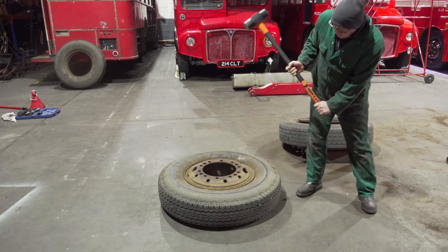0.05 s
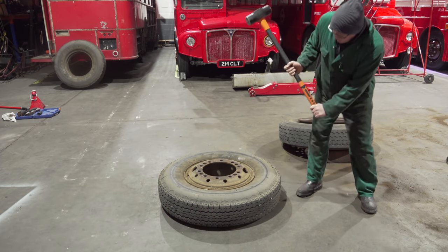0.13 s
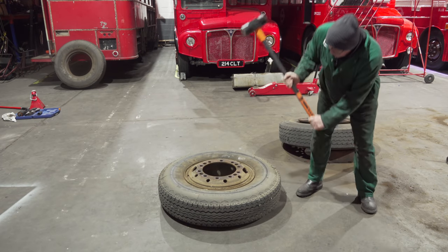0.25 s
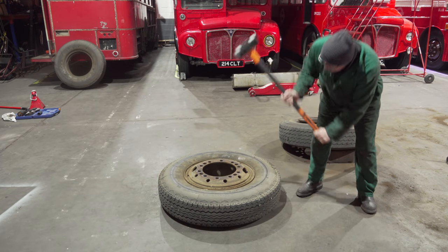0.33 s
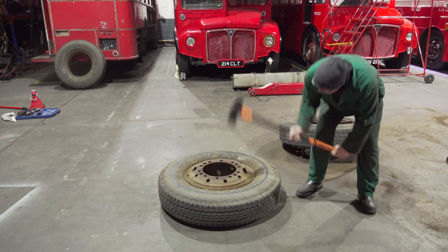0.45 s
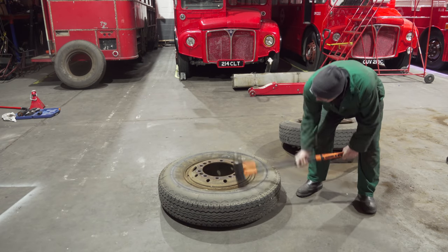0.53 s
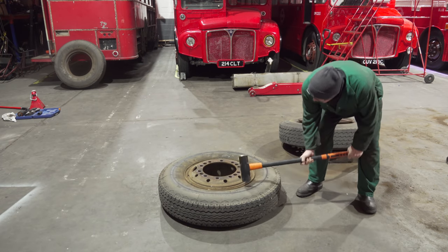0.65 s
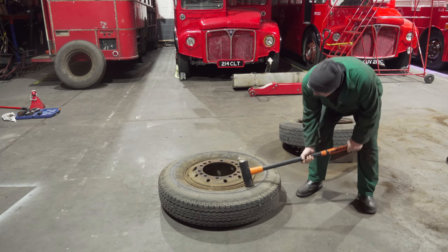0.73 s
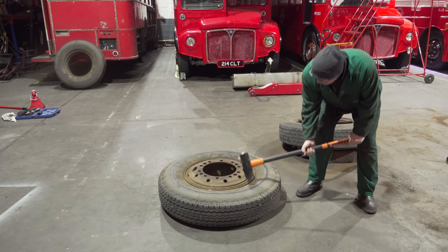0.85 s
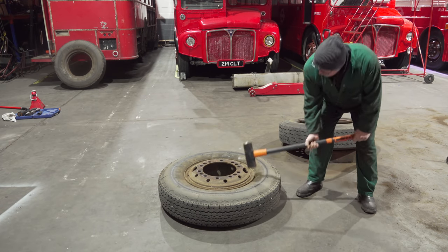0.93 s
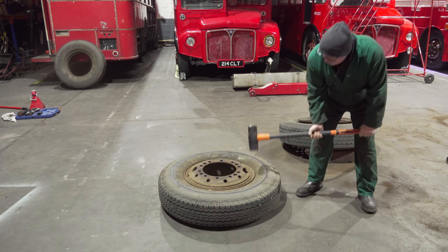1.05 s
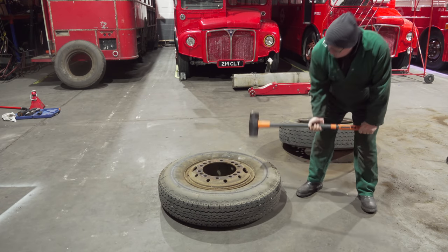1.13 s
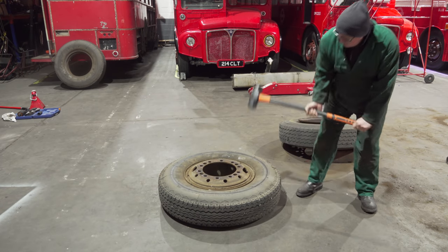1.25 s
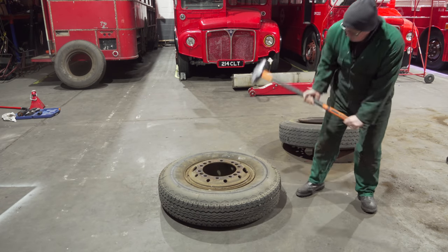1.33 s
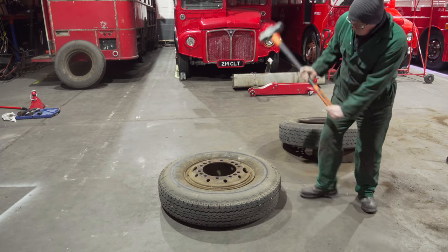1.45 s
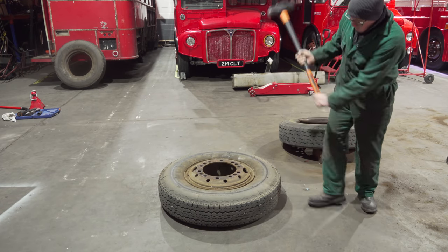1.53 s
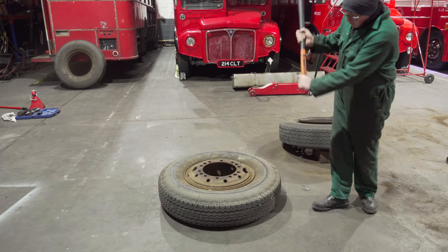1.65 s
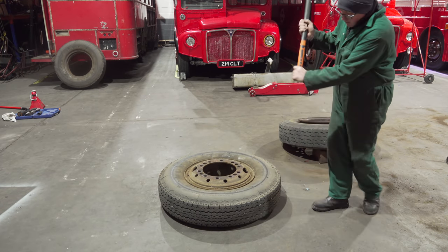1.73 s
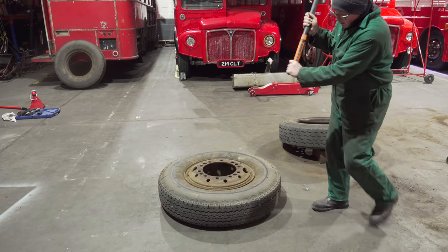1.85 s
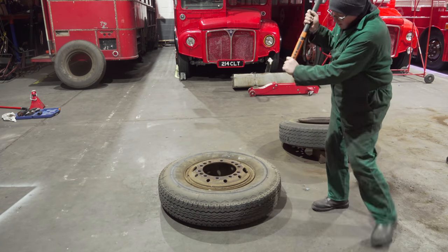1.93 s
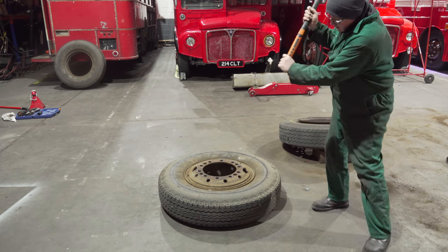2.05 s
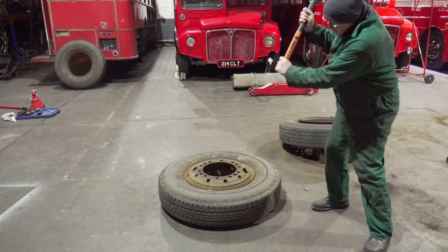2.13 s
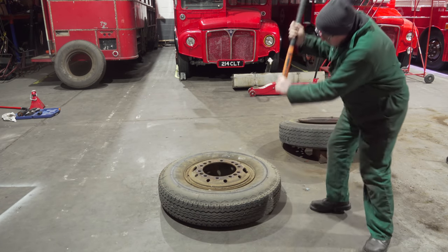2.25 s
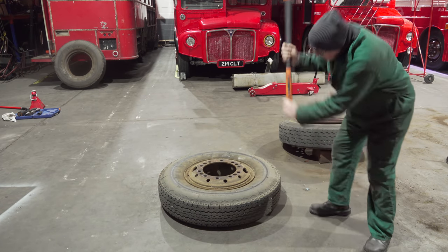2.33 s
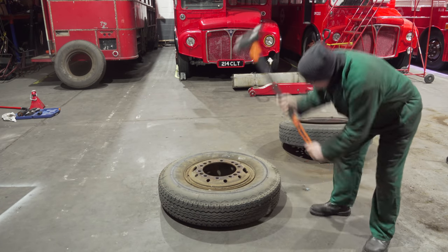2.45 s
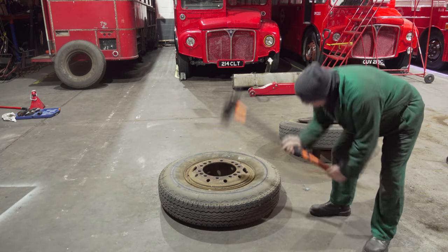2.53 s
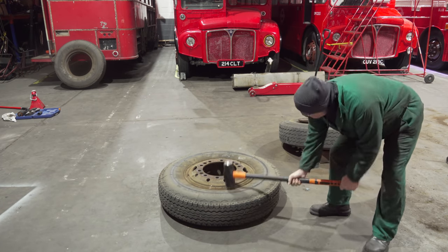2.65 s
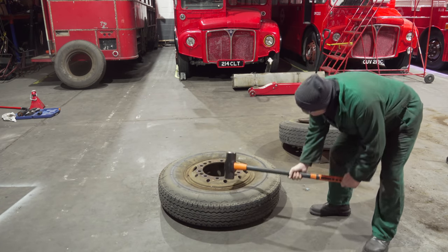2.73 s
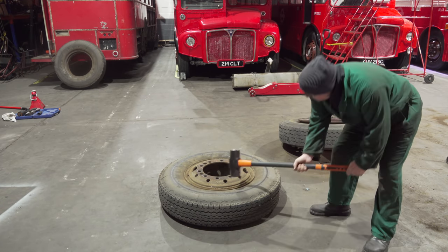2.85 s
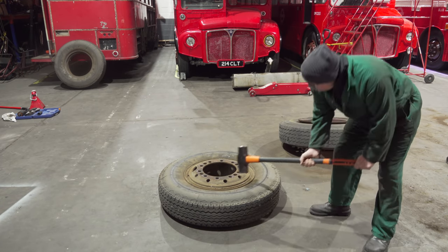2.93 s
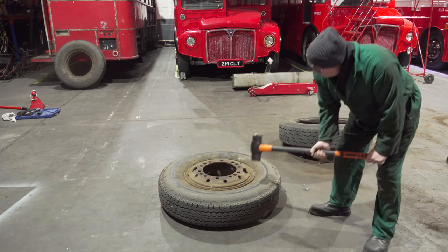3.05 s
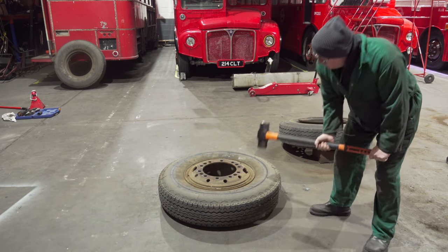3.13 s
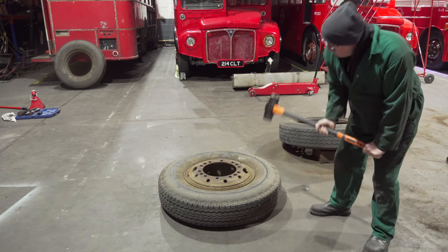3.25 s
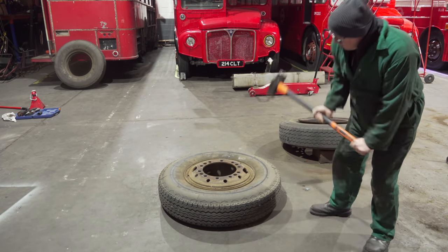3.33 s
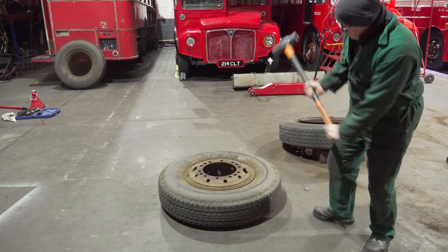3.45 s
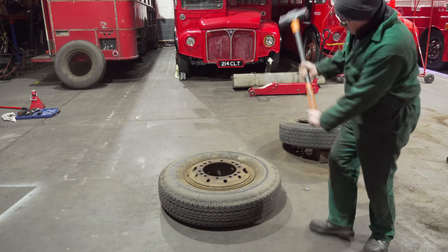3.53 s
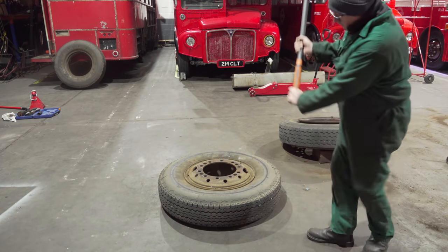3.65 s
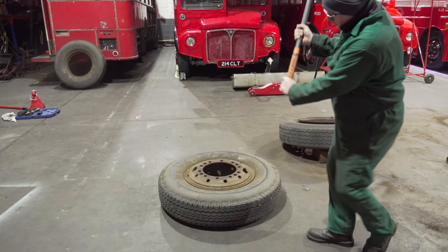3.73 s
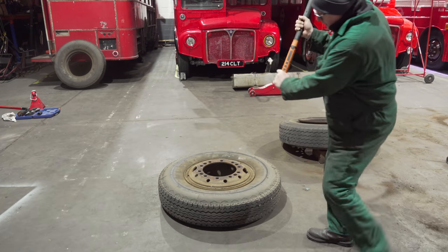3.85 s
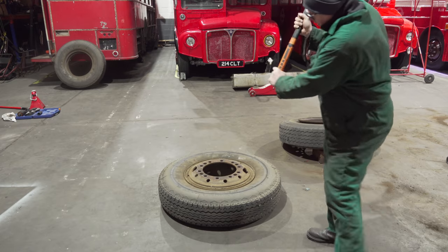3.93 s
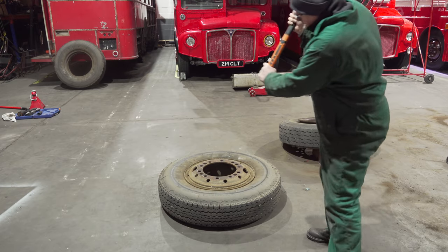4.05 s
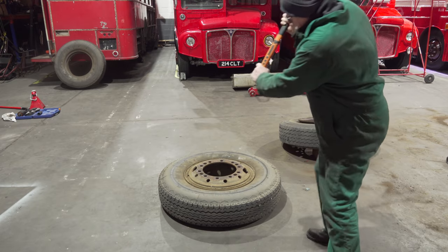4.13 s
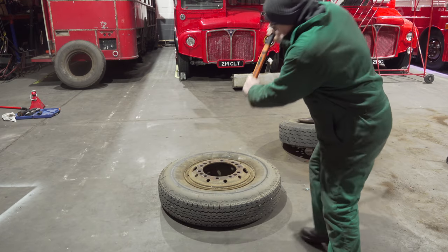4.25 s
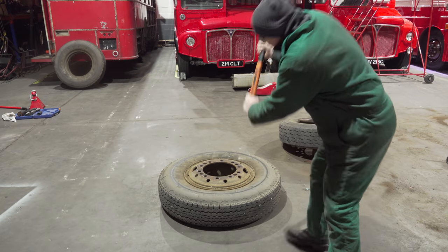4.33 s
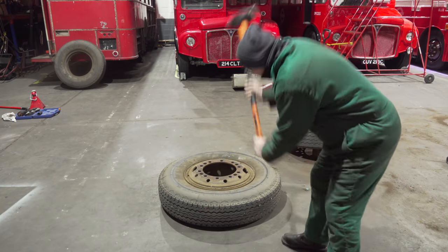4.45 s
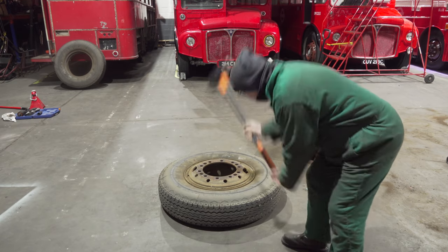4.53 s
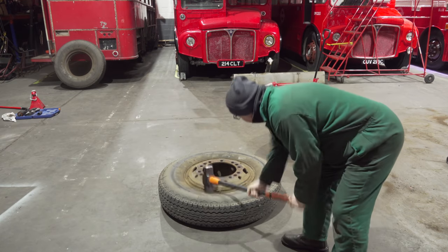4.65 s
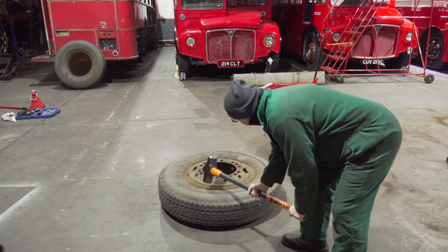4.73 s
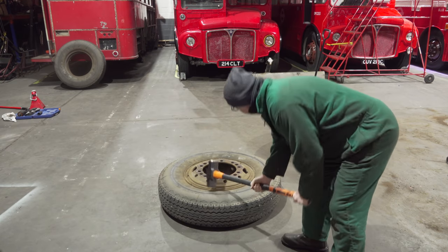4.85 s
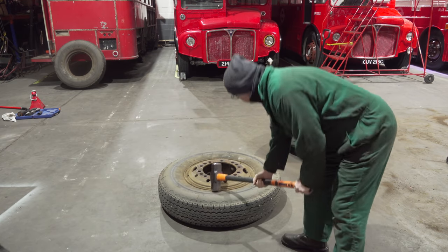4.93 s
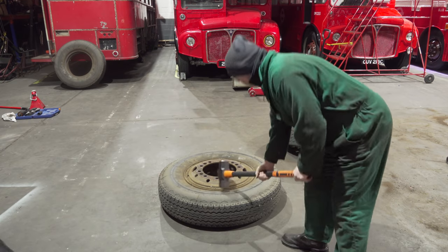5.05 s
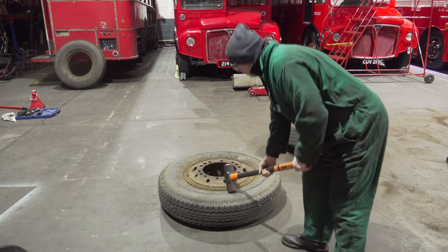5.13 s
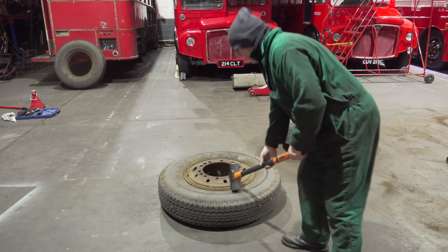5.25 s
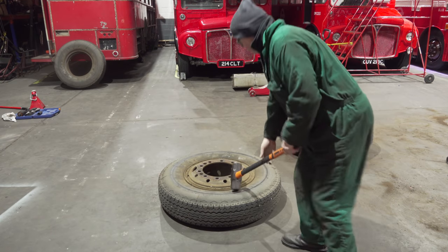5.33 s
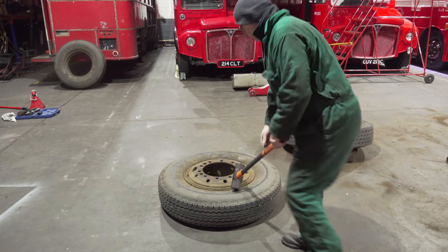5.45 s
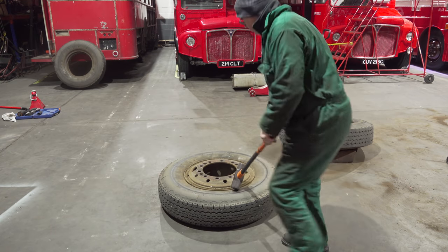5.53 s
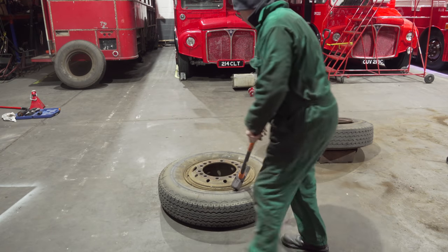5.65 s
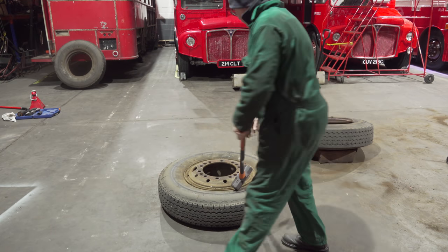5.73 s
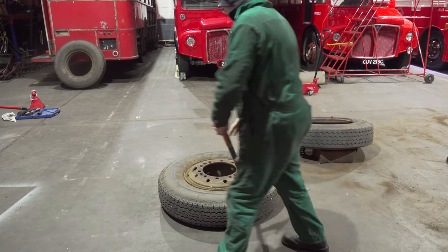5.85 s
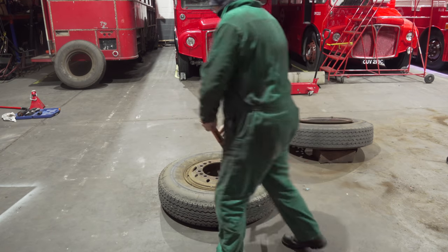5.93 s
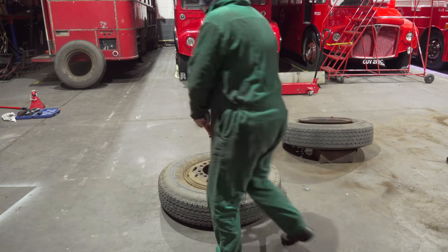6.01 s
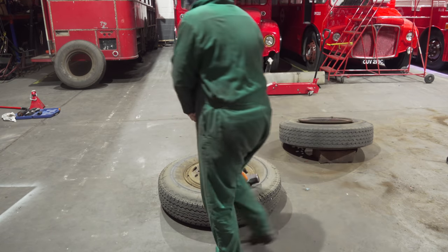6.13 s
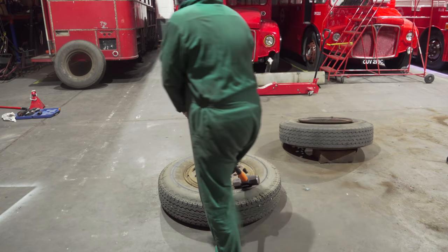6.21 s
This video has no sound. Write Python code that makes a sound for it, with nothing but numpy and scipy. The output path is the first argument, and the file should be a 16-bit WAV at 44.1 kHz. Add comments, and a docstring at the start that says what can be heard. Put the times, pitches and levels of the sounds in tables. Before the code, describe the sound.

Quiet hall air and a hand sliding on a shaft, then a violent thud and steel clatter as a sledgehammer hits a tyred wheel. The tyre chokes the ring, but the big garage answers with over a second of echo. Two more blows follow at roughly two-second intervals, each preceded by small handling sounds and a planted, gritty boot. A soft, dull knock ends it. Fairly close microphone, loud peaks briefly ducked.

```python
"""A worker in a big garage slides his hands on a sledgehammer shaft, then hits a lorry tyre and its steel wheel.
Three blows: pressure pulse (thud), decaying random clatter (crash) and damped sine modes (wheel ring).
A limiter ducks each blow, then lets the long banded-noise echo of the hall swell up.
Between blows, filtered slips and knocks make sliding palms, grips, swishing overalls and boots on concrete.
At the end the head is set down: a soft knock, a tyre boom and a faint, dull wheel ring, over steady hall air."""
import sys
import numpy as np
from scipy import signal
from scipy.fft import rfft, irfft, next_fast_len
from scipy.io import wavfile
from scipy.ndimage import uniform_filter1d

SR = 44100
rng = np.random.default_rng(int(sys.argv[2]) if len(sys.argv) > 2 else 0)


def unload_audio(sound):
    """Save the sound as a 16-bit wav file, at the path given as the first command line argument."""
    columns = np.transpose(np.atleast_2d(sound))
    # keep every value between -1 and 1, then stretch to whole-number steps
    steps = np.round(np.clip(columns, -1, 1) * 32767)
    wavfile.write(sys.argv[1], SR, steps.astype(np.int16))


N = 276938

# blows: (time [s], relative thud level [dB], relative crash level [dB], crash delay [s], crash t60 [s])
HAMMER_BLOWS = [(0.6018, -0.95, -0.4, 0.00027, 0.027), (2.6715, 0.5, 0, .0014, 0.028),
                (4.708, 0.5, 0, .0009, 0.027)]
# steel wheel modes, damped by the tyre; each blow lands on another spot:
# (frequency [Hz], t60 [s], relative level in blow 1 [dB], in blow 2 [dB], in blow 3 [dB])
WHEEL_MODES = [(131, 0.11, -25, -27.5, -28), (300, 0.055, -20, -16, -15), (436, 0.053, -33.5, -17.5, -26),
               (619, 0.092, -16.5, -17, -19), (756, 0.13, -21, -20.5, -20), (848.6, 0.058, -20, -13.5, -29),
               (1033, 0.13, -21, -20.5, -19.5), (1198, 0.054, -26.5, -29, -18.5),
               (1252, 0.096, -33, -27, -20.5), (1500, 0.28, -25, -25, -28.5), (1913, 0.25, -38, -31.5, -32),
               (2587, 0.058, -19.5, -25.5, -23.5), (2856, 0.11, -26, -21, -28.5),
               (3110, .07, -24, -29.5, -31.5), (3430, .08, -25.5, -25.5, -26), (3875, 0.11, -20, -18, -22),
               (4110, 0.085, -22, -25.5, -22.5), (4255, 0.06, -29, -26, -19.5),
               (4350, .06, -24, -23.5, -21), (4800, 0.055, -24.5, -20.5, -23.5),
               (4930, 0.041, -34, -29.5, -20.5), (6500, .025, -21, -15.5, -13),
               (7460, 0.042, -26.5, -30.5, -23.5)]
# boot planted just before the blow:
# (time [s], relative thump level [dB], thump top edge [Hz], relative slap level [dB], grit level [dB])
BOOT_STAMPS = [(2.553, -41, 1280, -53, -66), (4.624, -45, 403, -43.5, -46)]


def from_db(db):
    """Decibels to gain."""
    return 10 ** (np.asarray(db) / 20)


def rms_one(x):
    """Scale to rms 1."""
    return x / np.sqrt(np.mean(x ** 2) + 1e-20)


def seconds(length_s):
    """Time axis of a short sound."""
    return np.arange(int(length_s * SR)) / SR


def fade(t, t60_s):
    """Exponential decay, 60 dB in t60."""
    return np.exp(-np.log(1000) * t / t60_s)


def add(track, time_s, sound):
    """Mix a sound into the track."""
    at = int(np.clip(round(time_s * SR), 0, N - 1))
    track[at:at + len(sound)] += sound[:N - at]


def band(x, low_hz, high_hz, order=2):
    """Causal Butterworth band-pass."""
    return signal.sosfilt(signal.butter(order, [low_hz, high_hz], "band", fs=SR, output="sos"), x)


def within(x, low_hz, high_hz, order=3):
    """Keep one band, at the same energy."""
    kept = band(x, low_hz, high_hz, order=order)
    return kept * np.linalg.norm(x) / np.linalg.norm(kept)


def coloured(x, spectrum):
    """Causal (minimum-phase) filter with a given spectrum shape and unit energy."""
    size = 2 * next_fast_len(len(x))
    hz, db = np.transpose(spectrum)
    log_hz = np.log(np.fft.rfftfreq(size, 1 / SR) + 1)
    gain = from_db(np.interp(log_hz, np.log(hz), db))
    # fold the cepstrum onto positive time
    cepstrum = irfft(np.log(rms_one(gain)))
    cepstrum[1:size // 2] *= 2
    cepstrum[size // 2 + 1:] = 0
    response = np.exp(rfft(cepstrum))
    return irfft(rfft(x, size) * response)[:len(x)]


def burst(t, t60_s, all_round):
    """Unit-energy clatter; summed over all directions its ripples even out, so the hall gets one clean pulse."""
    if all_round:
        clatter = 1.0 * (t == 0)
    else:
        clatter = rng.choice([-1, 1], len(t)) * fade(t, t60_s)
    return clatter / np.linalg.norm(clatter)


def knock(t60_s, all_round):
    """Short dead contact: clatter starting at rms 1, or one pulse of the same energy for the hall."""
    t = seconds(.3)
    return burst(t, t60_s, all_round) * np.linalg.norm(fade(t, t60_s))


def slips(grain_db=6.5):
    """Rubbing: half a second of tiny slips of uneven size, rms 1."""
    count = len(seconds(.5))
    sizes = from_db(grain_db * rng.standard_normal(count))
    return rms_one(rng.standard_normal(count) * sizes)


def stroke(length_s):
    """Slips under one movement that speeds up and stops."""
    speed = np.abs(np.sin(np.pi * np.minimum(seconds(.5) / length_s, 1)))
    return slips() * np.sqrt(speed)


def still_air(level_db=-71.5):
    """Still air of the hall: steady coloured noise."""
    # (frequency [Hz], relative level [dB])
    air_spectrum = [(18, -45), (30, -10), (103, -10.5), (170, 3.5), (233, -4.5), (486, -3), (822, -1.5),
                    (1130, -5), (2480, -4.5), (4300, -7.5), (9970, -16.5), (14800, -15), (16000, -23)]
    return from_db(level_db) * rms_one(coloured(rng.standard_normal(N), air_spectrum))


def hands():
    """Palms rub along the shaft as the grip changes for the lift and for the swing."""
    # slides: (time [s], length [s], level [dB])
    slides = [(0.0, 0.03, -57), (0.018, .036, -49.5), (1.583, 0.071, -61), (1.963, 0.1, -69),
              (2.047, .038, -57.5), (2.348, .026, -63), (2.37, 0.052, -57.5), (3.595, .075, -56.5),
              (3.961, 0.053, -68.5), (4.007, 0.034, -62.5), (4.407, .04, -63)]
    # palm on the shaft: (frequency [Hz], relative level [dB])
    palm_spectrum = [(200, -22.5), (700, -10.5), (1500, -3.5), (2800, 1), (5500, -3), (8000, -7.5),
                     (12000, -16), (16000, -21.5)]
    out = np.zeros(N)
    for time_s, length_s, db in slides:
        add(out, time_s, from_db(db) * coloured(stroke(length_s), palm_spectrum))
    return out


def ticks(all_round, t60_s=.02):
    """Tiny hard contacts, an octave either side of their centre; the loudest is the head grazing the rim."""
    # (time [s], relative level [dB], centre [Hz])
    small_ticks = [(0.232, -51.5, 2800), (1.966, -55.5, 7000), (2.348, -55, 1500), (2.370, -51.5, 7500),
                   (4.407, -57.5, 1500), (4.682, -43, 6500), (4.7057, -29, 5600), (5.635, -61, 8000),
                   (5.674, -56, 8010)]
    out = np.zeros(N)
    for time_s, db, hz in small_ticks:
        add(out, time_s, from_db(db) * within(knock(t60_s, all_round), hz / 2, hz * 2))
    return out


def thuds(level_db=16.5):
    """The head lands and tyre and wheel disc give one pressure pulse."""
    # (frequency [Hz], relative level [dB])
    thud_spectrum = [(8, -26.5), (28, -13.5), (55, -11), (80, -11.5), (105, -3.5), (180, -2), (235, -5),
                     (380, -0.5), (560, -1), (990, -2), (1130, -9.5), (1500, -10.5), (2200, -22.5),
                     (16000, -62.5)]
    out = np.zeros(N)
    pulse = coloured(1.0 * (seconds(.3) == 0), thud_spectrum)
    for time_s, db, *_ in HAMMER_BLOWS:
        add(out, time_s, -from_db(level_db + db) * pulse)
    return out


def crashes(all_round, level_db=17.5):
    """A moment later steel clatters on steel."""
    # (frequency [Hz], relative level [dB])
    crash_spectrum = [(100, -20), (700, -3.5), (1300, -2.5), (1900, -1), (2600, 0.16), (3500, 2),
                      (4500, 3.5), (5200, -1), (6600, -3.5), (8300, -2.5), (10000, -10.5), (13000, -13.5),
                      (16000, -20.5)]
    out, t = np.zeros(N), seconds(.15)
    for time_s, _, db, delay_s, t60_s in HAMMER_BLOWS:
        clatter = coloured(burst(t, t60_s, all_round), crash_spectrum)
        add(out, time_s + delay_s, from_db(level_db + db) * clatter)
    return out


def wheel(level_db=-0.5):
    """The wheel rings briefly after each blow: damped modes in random phase."""
    out, t = np.zeros(N), seconds(.3)
    hz, t60_s, *strengths_db = np.transpose(WHEEL_MODES)[:, :, None]
    for (time_s, _, _, delay_s, _), db in zip(HAMMER_BLOWS, strengths_db):
        phase = 2 * np.pi * rng.random(hz.shape)
        modes = from_db(level_db + db) * np.sin(2 * np.pi * hz * t + phase) * fade(t, t60_s)
        add(out, time_s + delay_s, np.sum(modes, axis=0))
    return out


def hall_tail(build_s=0.03):
    """Diffuse echo: noise thickens as sound reaches the far walls, and each band decays at its own rate."""
    # (frequency [Hz], t60 [s], relative echo level [dB])
    hall_bands = [(30.08, 0.55, -22.5), (70, 1.2, -9.5), (140, 1.02, -1.5), (284, 0.99, -1),
                  (590, 1.272, 1.2), (1170, 1.38, 1), (2200, 1.328, 1.5), (4320, 1.118, 0.1),
                  (6500, 0.84, 1), (8600, 0.63, -1), (10500, .52, -3), (16000, 0.49, -8)]
    t = seconds(2)
    white = rfft(rng.standard_normal(len(t)))
    log_hz = np.log(np.fft.rfftfreq(len(t), 1 / SR) + 1)
    hz, t60_s, db = np.transpose(hall_bands)
    tail = 0
    for k, share in enumerate(np.eye(len(hz))):
        band_noise = irfft(white * np.interp(log_hz, np.log(hz), share), len(t))
        tail = tail + from_db(db[k]) * band_noise * fade(t, t60_s[k])
    return tail * (1 - np.exp(-(t / build_s) ** 2)) / np.sqrt(SR)


def garage(x):
    """Diffuse echo; each call draws its own paths to the walls."""
    return signal.fftconvolve(x, hall_tail())[:N]


def nearby(x):
    """Direct sound and a few low-passed reflections; the closest ones are dull."""
    # floor, tyre and nearby vehicles: (delay [s], level [dB], top edge [Hz])
    reflections = [(.0042, -14.5, 2552), (.0072, -10.5, 2010), (0.011, -9, 1500), (.024, -19.5, 14000),
                   (0.032, -15, 8000), (0.046, -20, 5980)]
    out = x.copy()
    for delay_s, db, top_hz in reflections:
        dulled = signal.sosfilt(signal.butter(2, top_hz, fs=SR, output="sos"), x)
        add(out, delay_s, from_db(db) * dulled)
    return out


def grips(all_round, t60_s=0.02):
    """A hand closes on the shaft with a dull pat."""
    # (time [s], relative level [dB])
    pats = [(1.657, -47), (2.038, -49), (2.402, -46.5), (3.605, -53), (3.991, -50.5), (4.060, -57.5),
            (4.456, -58), (4.600, -56.5)]
    # (frequency [Hz], relative level [dB])
    pat_spectrum = [(40, -16.5), (110, 1), (400, -0.5), (1200, -3.5), (1900, -16.5), (6000, -30),
                    (16000, -49.5)]
    out = np.zeros(N)
    for time_s, db in pats:
        add(out, time_s, from_db(db) * coloured(knock(t60_s, all_round), pat_spectrum))
    return out


def overalls(swish_s=.125, lean_s=4.35, lean_length_s=0.17, lean_db=-68, lean_low_hz=170, lean_high_hz=450):
    """Sleeves swish as the arms rise; the cloth flaps low as he leans into the last swing."""
    # swishes: (time [s], level [dB])
    sleeves = [(1.703, -64.5), (2.167, -68), (4.139, -69), (5.75, -72.5)]
    # cloth on cloth: (frequency [Hz], relative level [dB])
    cloth_spectrum = [(300, -14), (1200, -5.5), (2500, -0.5), (4800, -1.5), (8000, -10), (16000, -25.5)]
    out = np.zeros(N)
    for time_s, db in sleeves:
        add(out, time_s, from_db(db) * coloured(stroke(swish_s), cloth_spectrum))
    add(out, lean_s, from_db(lean_db) * within(stroke(lean_length_s), lean_low_hz, lean_high_hz))
    return out


def squeak(time_s=2.3685, length_s=0.016, level_db=-55, low_hz=14700, high_hz=15600):
    """One quick slide gives a thin squeak, too high to carry to the walls."""
    out = np.zeros(N)
    add(out, time_s, from_db(level_db) * within(stroke(length_s), low_hz, high_hz))
    return out


def stamps(all_round, heel_t60_s=0.045, slap_t60_s=0.076, heel_low_hz=130, slap_low_hz=2080,
           slap_high_hz=2580, heel_echo_db=14.0, slap_echo_db=11.0):
    """The heel thumps and the sole slaps; down on the floor they reach the microphone mostly as echo."""
    out = np.zeros(N)
    for time_s, thump_db, top_hz, slap_db, _ in BOOT_STAMPS:
        thump = within(knock(heel_t60_s, all_round), heel_low_hz, top_hz, order=8)
        add(out, time_s, from_db(thump_db + heel_echo_db * all_round) * thump)
        slap = within(knock(slap_t60_s, all_round), slap_low_hz, slap_high_hz)
        add(out, time_s, from_db(slap_db + slap_echo_db * all_round) * slap)
    return out


def skids(grit_t60_s=0.41, rumble_db=-10.5, rumble_t60_s=.4, rumble_low_hz=120):
    """The planted boot grinds to a stop on the concrete: grit above, a rumble of the sole below."""
    # grit under the sole: (frequency [Hz], relative level [dB])
    grit_spectrum = [(200, -10), (700, -4), (1500, -4), (2300, 0.5), (4500, 0), (7000, -5), (10000, -16.5),
                     (16000, -24)]
    out, t = np.zeros(N), seconds(.5)
    for time_s, thump_db, top_hz, _, grit_db in BOOT_STAMPS:
        grit = coloured(slips() * fade(t, grit_t60_s), grit_spectrum)
        add(out, time_s, from_db(grit_db) * grit)
        rumble = within(slips() * fade(t, rumble_t60_s), rumble_low_hz, top_hz, order=8)
        add(out, time_s, from_db(thump_db + rumble_db) * rumble)
    return out


def set_down(all_round, time_s=6.1138, knock_db=-42.5, ring_db=-40, boom_db=-49, boom_hz=170.3,
             boom_t60_s=0.23, knock_t60_s=0.029, low_hz=80, high_hz=620, soft_hz=2600):
    """The head comes to rest on the wheel: a soft knock, a boom of the tyre and a faint, dull ring."""
    out, t = np.zeros(N), seconds(.3)
    hz, t60_s, *strengths_db = np.transpose(WHEEL_MODES)[:, :, None]
    strength = from_db(np.mean(strengths_db, axis=0)) / (1 + (hz / soft_hz) ** 2)
    modes = strength * np.cos(2 * np.pi * hz * t) * fade(t, t60_s)
    add(out, time_s, from_db(ring_db) * modes.sum(axis=0))
    boom = np.cos(2 * np.pi * boom_hz * t) * fade(t, boom_t60_s)
    add(out, time_s, from_db(boom_db) * boom)
    add(out, time_s, from_db(knock_db) * within(knock(knock_t60_s, all_round), low_hz, high_hz))
    return band(out, low_hz, soft_hz, order=1)


def scene(thud_echo_db=7.0, crash_echo_db=9.0, wheel_echo_db=8.5, rub_echo_db=6.0, grip_echo_db=7.0,
          tick_echo_db=4.0, rest_echo_db=8.5):
    """Hammer and worker share one hall."""
    thud, ring = thuds(), wheel()
    rubbing = hands() + skids() + overalls()
    contacts = sum(source(all_round=False) for source in (crashes, grips, ticks, stamps, set_down))
    direct = nearby(thud + ring + rubbing + squeak() + contacts)

    thud_and_rub = from_db(thud_echo_db) * thud + from_db(rub_echo_db) * rubbing
    crash_and_tick = from_db(crash_echo_db) * crashes(all_round=True)
    crash_and_tick += from_db(tick_echo_db) * ticks(all_round=True)
    ring_and_contacts = from_db(wheel_echo_db) * ring + stamps(all_round=True)
    ring_and_contacts += from_db(grip_echo_db) * grips(all_round=True)
    ring_and_contacts += from_db(rest_echo_db) * set_down(all_round=True)
    echo = garage(thud_and_rub) + garage(crash_and_tick) + garage(ring_and_contacts)
    return (direct + echo + still_air())[None]


def limiter(x, ceiling_db, release_db_per_s):
    """The gain drops at once on a peak and climbs back at a steady rate."""
    power = uniform_filter1d(x ** 2, size=24, axis=-1)
    excess_db = np.maximum(10 * np.log10(np.abs(power) + 1e-12) - ceiling_db, 0)
    climb_db = release_db_per_s * np.arange(N) / SR
    # a running maximum holds each peak; the climb releases it
    gain_db = climb_db - np.maximum.accumulate(excess_db + climb_db, axis=-1)
    return x * from_db(gain_db)


def record(dry, peak_ceiling=.5, cutoff_hz=15900):
    """Limiter, rounded peaks, steep top cut."""
    held = limiter(dry, ceiling_db=-10.0, release_db_per_s=129.5)
    rounded = held / (1 + (held / peak_ceiling) ** 4) ** (1 / 4)
    return signal.sosfilt(signal.ellip(10, .1, 80, cutoff_hz, fs=SR, output="sos"), rounded)


dry = scene()
out = record(dry)
unload_audio(out)
```